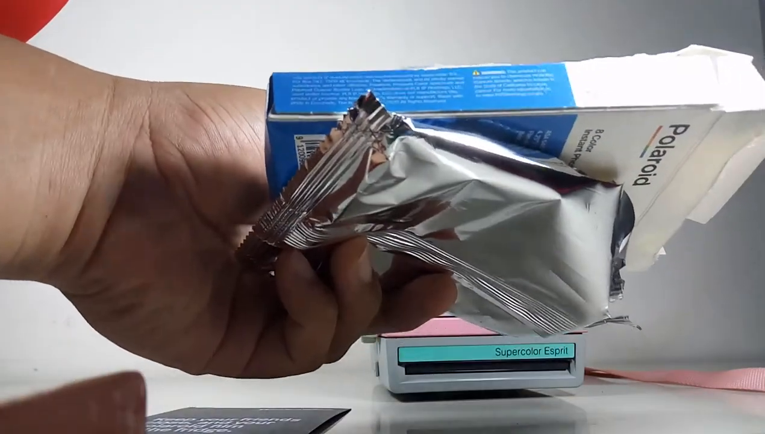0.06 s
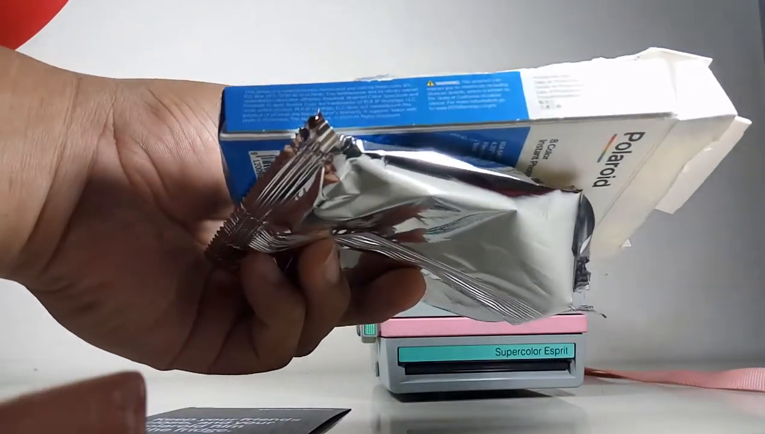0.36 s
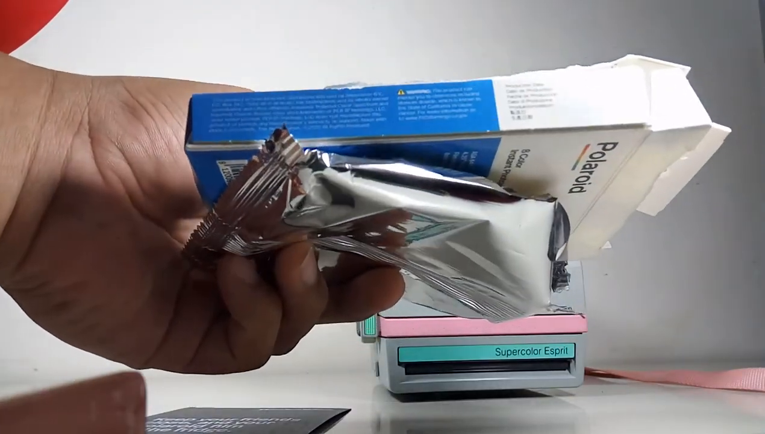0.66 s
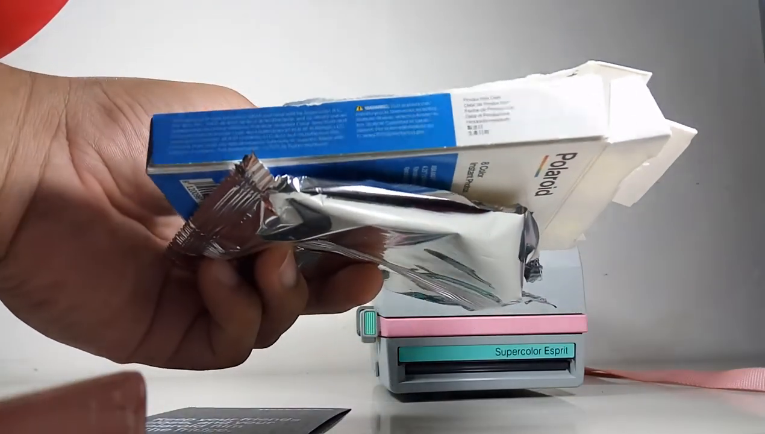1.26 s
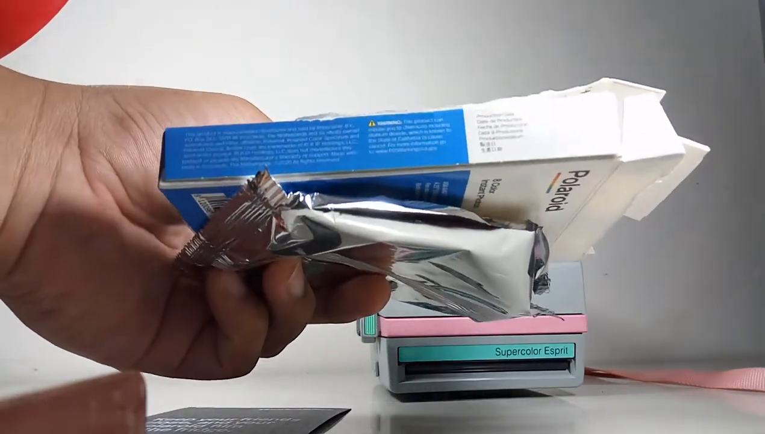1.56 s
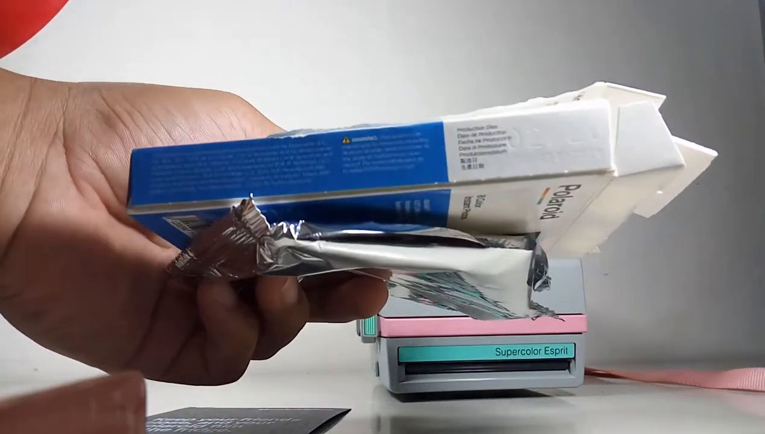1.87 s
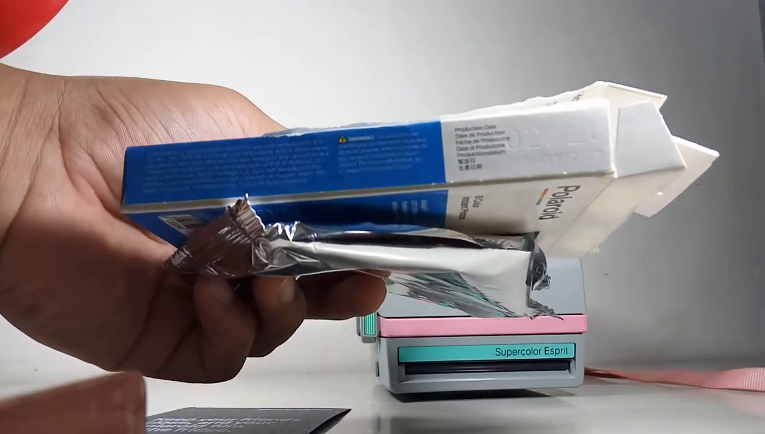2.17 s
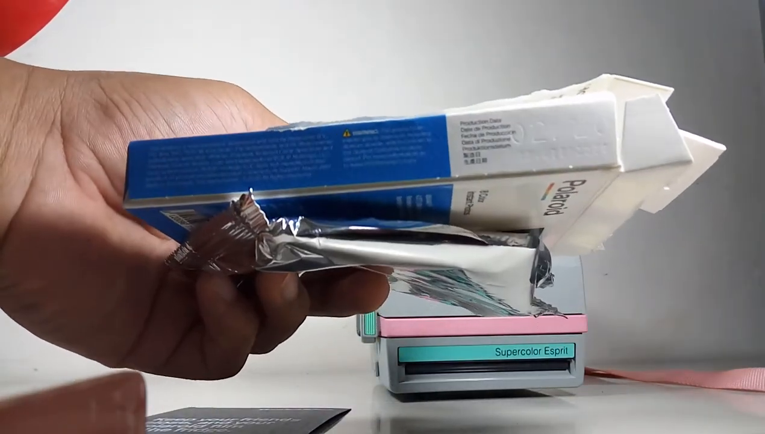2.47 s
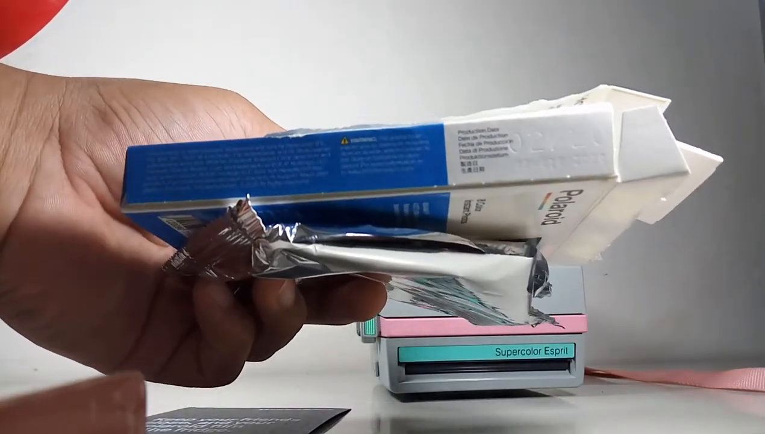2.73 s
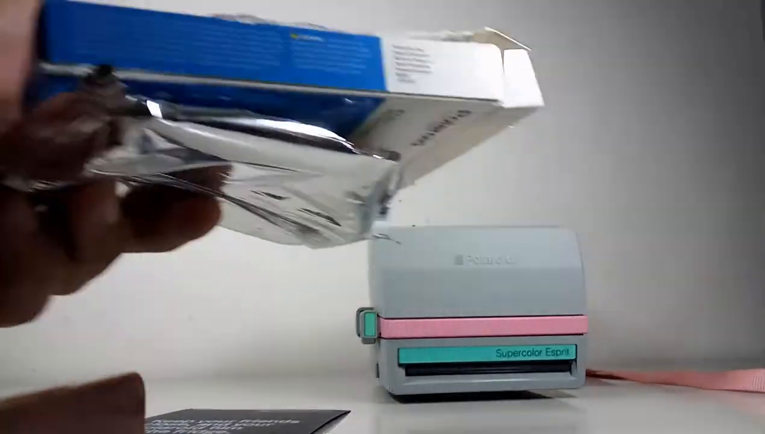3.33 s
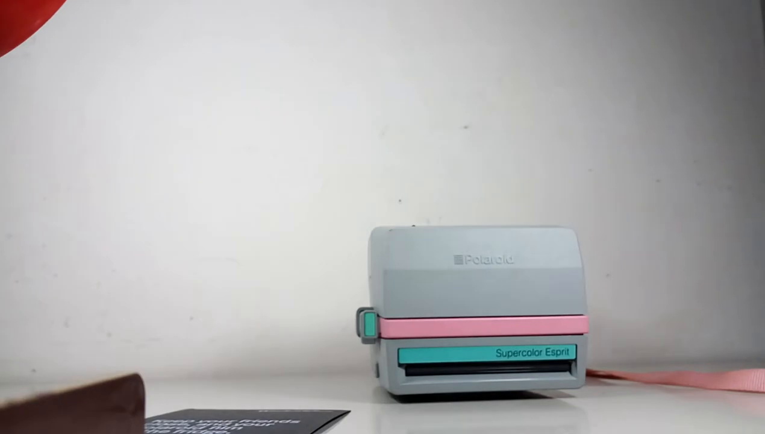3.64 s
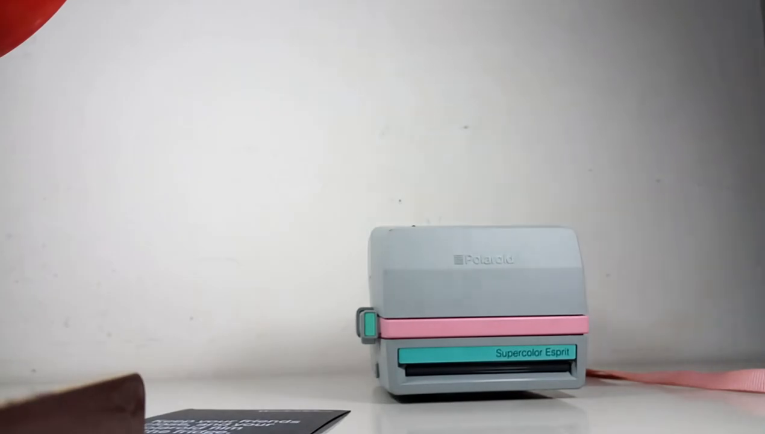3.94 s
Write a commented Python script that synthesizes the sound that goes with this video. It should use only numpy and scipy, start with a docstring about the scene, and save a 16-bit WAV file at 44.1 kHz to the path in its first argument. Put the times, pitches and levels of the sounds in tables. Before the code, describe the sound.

A foil pack crinkles now and then, held with a cardboard box close to the microphone in a small room. A low draught flutters on the right throughout. Near the end the foil slides and crackles more, and the box scuffs.

```python
"""A hand holds a cardboard box and a foil film pack close to the microphones, in a small room.
It opens on a soft scuff of the box and a crease brushing the card; from there to the end, low buffeting
like a draught flutters on the right microphone port, over faint hiss. From 0.75 s creases in the foil pop
now and then, each ringing and cracking through the pack. From 3 s the hand draws away: the foil slides,
swishes and crackles, and from 3.6 s the box scuffs again."""
import sys
import numpy as np
from scipy import signal
from scipy.fft import rfft, irfft
from scipy.io import wavfile

SR = 44100
rng = np.random.default_rng(int(sys.argv[2]) if len(sys.argv) > 2 else 0)


def persist_wave(psi):
    """Save psi, clipped to +-1, as 16-bit WAV."""
    counts = np.round(np.clip(psi, -1, 1) * 32767).astype(np.int16)
    wavfile.write(sys.argv[1], SR, np.atleast_2d(counts).T)


N = 176400
TIME = np.arange(N) / SR

# Levels set each sound's loudness before its trim, the room and the microphones;
# the eddies then also pass the port's tone.

# the cardboard is knocked or scuffed: start_s, level_db, t60_s
BOX_SCUFFS = [(.001, -54, 0.1), (0.021, -55, 0.08), (3.61, -44.5, 0.099), (3.827, -43.5, 0.051),
              (3.8395, -38.5, 0.024), (3.858, -54, 0.13), (3.931, -50.5, 0.091)]
# resonances of the box: pitch_hz, width_hz, gain_db
BOX_MODES = [(595, 67, 5.5), (1030, 750, 3), (1300, 420, 8), (2410, 590, 7.5), (2920, 230, 9.5),
             (3500, 1200, -4)]
# a crease brushes along the card: time_s, level_db
BRUSH_LEVEL = [(0, -54.5), (.03, -75), (.06, -90), (1.74, -94.5), (1.75, -57), (1.785, -67), (1.8, -61),
               (1.85, -71), (1.885, -89), (1.95, -95)]
# thin resonances of that crease: pitch_hz, width_hz, gain_db
CREASE_MODES = [(5600, 210, 7), (6600, 1300, 3)]
# strength of the draught on the port: time_s, level_db
DRAUGHT_LEVEL = [(0.0, -50), (0.02, -33.5), (0.1, -48), (0.13, -55.5), (0.2, -64.5), (0.27, -35),
                 (0.3, -44.5), (0.33, -35.5), (0.4, -44), (0.48, -44), (0.51, -46.5), (0.56, -47.5),
                 (0.59, -69), (0.62, -36.5), (0.76, -46), (0.79, -37), (0.85, -65), (0.88, -41.5),
                 (0.93, -65), (0.96, -44.5), (0.98, -31.5), (1.02, -44), (1.2, -41), (1.34, -44.5),
                 (1.36, -37), (1.4, -44), (1.45, -42), (1.49, -70), (1.54, -64), (1.57, -41), (1.73, -43),
                 (1.77, -44.5), (1.85, -36), (1.88, -41.5), (2.03, -38.5), (2.07, -47.5), (2.14, -40.5),
                 (2.25, -38.5), (2.29, -62), (2.36, -29.5), (2.38, -49), (2.45, -35), (2.48, -47.5),
                 (2.6, -52.5), (2.63, -46), (2.67, -46.5), (2.7, -52), (2.78, -40), (2.82, -33.5),
                 (2.9, -59), (3.0, -41.5), (3.14, -58), (3.24, -46.5), (3.27, -35), (3.36, -40),
                 (3.43, -51), (3.5, -37.5), (3.65, -64.5), (3.68, -37), (4.0, -42)]
# large single eddies hit the port: centre_s, level_db, nominal_pitch_hz
LARGE_EDDIES = [(0.0259, -19, 214), (0.0575, -25, 145), (0.0962, -28, 135), (0.2669, -19.5, 199),
                (0.3185, -28, 252), (0.3378, -24.5, 206), (0.4358, -30, 190), (0.4769, -27, 235),
                (0.5359, -30.5, 190), (0.553, -24, 220), (0.6343, -25.5, 187), (0.6523, -26.5, 242),
                (0.7154, -28, 106), (0.7748, -24, 222), (0.793, -29.5, 161), (0.8824, -19.5, 159),
                (0.9695, -16.5, 279), (0.9943, -19, 324), (1.0515, -33, 150), (1.079, -31.5, 130),
                (1.1151, -24, 240), (1.1597, -20, 203), (1.2015, -21, 204), (1.2489, -22.5, 240),
                (1.36, -19.5, 192), (1.4366, -28, 197), (1.5722, -22.5, 270), (1.5894, -21, 280),
                (1.628, -25.5, 258), (1.663, -21, 196), (1.7165, -20.5, 253), (1.7395, -29, 180),
                (1.817, -20, 264), (1.8343, -20, 298), (1.8505, -17.5, 272), (1.8932, -26.5, 222),
                (1.9149, -27, 273), (1.9345, -31, 284), (1.9628, -30, 160), (1.9785, -21.5, 242),
                (2.0193, -21.5, 264), (2.1388, -23.5, 256), (2.1732, -23, 220), (2.2394, -24.5, 173),
                (2.2563, -36, 180), (2.3186, -32, 198), (2.3405, -27.5, 305), (2.3556, -19.5, 300),
                (2.4149, -22.5, 257), (2.4439, -12, 380), (2.5094, -31.5, 335), (2.5253, -31.5, 305),
                (2.6331, -33, 140), (2.7068, -23.5, 190), (2.7502, -27.5, 200), (2.7958, -31, 138),
                (2.8109, -27, 200), (2.8286, -22.5, 324), (2.9509, -30.5, 229), (2.9819, -29.5, 232),
                (2.9978, -22.5, 265), (3.0272, -29.5, 201), (3.0749, -34.5, 158), (3.2593, -27, 197),
                (3.2863, -23, 146), (3.3226, -24.5, 270), (3.3474, -20, 342), (3.3663, -27, 181),
                (3.4032, -33.5, 188), (3.4801, -30, 315), (3.5057, -28.5, 267), (3.5272, -34, 310),
                (3.6863, -17.5, 294), (3.7597, -27.5, 128), (3.7903, -22, 220), (3.8091, -32, 160),
                (3.8345, -22, 297), (3.8676, -27.5, 185), (3.8929, -27, 166), (3.9539, -31, 168)]
# tone the port gives the eddies: frequency_hz, gain_db
PORT_EQ = [(20, -6), (50, -10), (85, 4), (150, 4.5), (260, 0.5), (380, 1), (600, 0.5), (900, 5.5),
           (1500, -19)]
# tone of the rumble under the eddies: frequency_hz, gain_db
RUMBLE_EQ = [(20, -17), (50, -19), (90, -6.5), (160, -5), (280, -10), (500, -19.5), (1500, -76)]
# tone of the room and microphone hiss: frequency_hz, gain_db
HISS_EQ = [(20, 8), (100, 9), (200, 3), (400, 8), (900, 5.5), (1500, 5), (2200, 0.5), (3000, 1),
           (4500, -4.5), (6600, -5.5), (8300, -19.5), (13000, -24), (15000, -4), (16000, -10.5)]
# a crease pops: start_s, ring_pitch_hz, ring_db, crack_db, sizzle_db, crack_low_cut_hz
CREASE_POPS = [(.749, 2970, -36, -32.5, -47.5, 4230), (0.7956, 6700, -61, -49, -51, 2600),
               (0.8056, 3010, -42.5, -42.5, -62, 2980), (1.0497, 2910, -41.5, -38, -56, 4100),
               (1.7484, 6160, -60, -60, -71.5, 5030), (1.8005, 6400, -62, -60, -90, 5000),
               (1.813, 5070, -51.5, -38, -46, 2700), (1.841, 5600, -58, -52.5, -86, 4970),
               (3.049, 6560, -51, -52.5, -58.5, 2400), (3.1644, 6680, -45.5, -41, -52, 2600),
               (3.3034, 3870, -56.5, -46, -52.5, 3320), (3.348, 5300, -58, -53, -58.5, 3000),
               (3.367, 4860, -71, -48, -69, 2260), (3.429, 3820, -45, -38.5, -59.5, 1800),
               (3.5478, 5090, -56, -48.5, -73, 3600), (3.607, 5040, -25.5, -25, -39.5, 2450),
               (3.624, 7000, -40.5, -51, -59, 1900), (3.6553, 5240, -46, -35.5, -46, 1690),
               (3.716, 3980, -56, -58, -55, 2300), (3.781, 5150, -55.5, -41, -56.5, 2250),
               (3.9199, 6300, -40, -32.5, -53, 1380), (3.9295, 3840, -40.5, -48, -47.5, 1970),
               (3.992, 6630, -43, -36.5, -50, 2200)]
# resonances of the foil pack: pitch_hz, width_hz, gain_db
FOIL_MODES = [(1390, 360, -9), (2213, 306, -3), (2910, 480, -2), (3910, 610, -2.5), (4370, 440, -6),
              (5025, 360, 1), (6027, 460, 1.5), (6300, 410, 2), (7080, 930, -6)]
# tone of the sizzle above those resonances: frequency_hz, gain_db
SIZZLE_EQ = [(5000, -21), (7500, -4.5), (9000, 2.5), (11200, 5.5), (13500, 0.5), (15000, 3.5), (16000, 2)]
# foil slides against the box: time_s, level_db
SLIDE_LEVEL = [(3.04, -73), (3.055, -63), (3.09, -54), (3.13, -51), (3.18, -50.5), (3.23, -55),
               (3.3, -51.5), (3.37, -52.5), (3.41, -59), (3.465, -51), (3.51, -50), (3.56, -61),
               (3.595, -67.5), (3.62, -42), (3.68, -53.5), (3.73, -43.5), (3.765, -50.5), (3.79, -45),
               (3.82, -45.5), (3.845, -36), (3.87, -43.5), (3.91, -43), (3.935, -40), (3.96, -39),
               (3.98, -44), (4.0, -36)]
# sizzle of the sliding foil relative to its body: time_s, level_db
SLIDE_SIZZLE = [(3.05, -1), (3.2, -11.5), (3.35, -10), (3.45, -10), (3.7, -16), (3.8, -6), (3.84, -15.5),
                (3.88, -4), (3.95, -16), (4.0, -5)]
# gliding swish of the sliding foil: time_s, pitch_hz, level_db
SWISH_PATH = [(3.039, 6400, -95), (3.06, 6300, -58), (3.11, 5500, -61), (3.15, 4600, -57),
              (3.21, 4400, -59.5), (3.27, 5400, -58), (3.33, 4800, -63), (3.402, 5300, -66),
              (3.47, 5000, -53.5), (3.53, 5000, -64), (3.59, 5000, -90), (3.75, 6600, -72),
              (3.89, 6800, -67), (4.0, 6600, -68)]
# bass response of the microphones: frequency_hz, gain_db
MICROPHONE_EQ = [(20, -2), (30, 0), (45, -5), (62, -8.5), (85, 2.5), (200, 2)]

FOIL_SIDE, SIZZLE_SIDE = 0.3, 0.73  # stereo width, side over mid
SIZZLE_PAN_DB = [[-2], [2]]  # left, right


def from_db(db):
    """Decibels to gain."""
    return 10 ** (np.asarray(db) / 20)


def unit_rms(x):
    """Scale to unit rms."""
    return x / np.sqrt(np.mean(x ** 2) + 1e-20)


def automation(rows):
    """Join (time_s, value) points into a curve at every sample."""
    return np.interp(TIME, *np.transpose(rows))


def equalise(x, points):
    """Minimum-phase EQ through (frequency_hz, gain_db) points."""
    size = 8192
    hz, db = np.transpose(points)
    grid_hz = np.maximum(np.fft.rfftfreq(size, 1 / SR), 1)
    gain = from_db(np.interp(np.log(grid_hz), np.log(hz), db))
    cepstrum = irfft(np.log(gain))
    cepstrum[1:size // 2] *= 2
    cepstrum[size // 2 + 1:] = 0
    impulse = irfft(np.exp(rfft(cepstrum)))
    return signal.fftconvolve(x, impulse[None], axes=-1)[:, :x.shape[-1]]


def resonate(x, modes):
    """Parallel resonances with alternating polarity."""
    out = 0
    for k, (hz, width_hz, db) in enumerate(modes):
        r = np.exp(-np.pi * width_hz / SR)
        poles = [1, -2 * r * np.cos(2 * np.pi * hz / SR), r * r]
        ringing = signal.lfilter([1, 0, -1], poles, x + 1e-18)
        out = out + (-1) ** k * from_db(db) * (1 - r * r) / 2 * ringing
    return out


def drift(rate_hz):
    """Smooth random wander of unit rms."""
    r = np.exp(-2 * np.pi * rate_hz / SR)
    return unit_rms(signal.lfilter([1], [1, -2 * r, r * r], rng.standard_normal(N + SR))[SR:])


def stereo_noise(side, size):
    """White noise, mostly shared by both channels."""
    mid, spread = rng.standard_normal((2, size))
    return np.array([mid + side * spread, mid - side * spread]) / np.sqrt(1 + side * side)


def burst(t, attack_s, t60_s):
    """Quick rise, exponential fall."""
    return (1 - np.exp(-t / attack_s)) * from_db(-60 * t / t60_s)


def place(out, start_s, sound, db):
    """Mix in a short sound whose energy equals 10 ms at the given level."""
    i = int(start_s * SR)
    rms_in_10_ms = np.sqrt(np.mean(sound ** 2) * sound.shape[-1] / (.01 * SR))
    out[:, i:i + sound.shape[-1]] += sound[..., :N - i] * from_db(db) / rms_in_10_ms


def box_scuffs():
    """Short scuffs sound the dull resonances of the cardboard."""
    out, t = np.zeros((2, N)), TIME[:SR // 8]
    for start_s, db, t60_s in BOX_SCUFFS:
        scrape = stereo_noise(FOIL_SIDE, len(t)) * burst(t, attack_s=0.003, t60_s=t60_s)
        place(out, start_s, resonate(scrape, BOX_MODES), db)
    return out


def friction_slips(slips_per_s=5000, spread_db=2.5):
    """Rubbing foil moves in tiny slips, random in time and strength."""
    hits = rng.random(N) < slips_per_s / SR
    return hits * from_db(spread_db * np.minimum(rng.exponential(1, N), 4))


def crease_brush(slips):
    """A crease brushes lightly along the card, and the slips sound its thin resonances."""
    grains = slips * stereo_noise(FOIL_SIDE, N)
    thin_tone = resonate(resonate(grains, CREASE_MODES), CREASE_MODES)
    return unit_rms(thin_tone) * from_db(automation(BRUSH_LEVEL))


def eddies(rows, stretch=0.97, sharpness=1.94):
    """Each eddy is one smooth pressure swing of a cycle or two, at a random phase."""
    out = np.zeros(N)
    for (centre_s, db, hz), angle in zip(rows, rng.uniform(0, 2 * np.pi, len(rows))):
        centre = int(centre_s * SR)
        near = slice(max(centre - SR // 40, 0), centre + SR // 40)
        phase = 2 * np.pi * hz * (TIME[near] - centre_s) / stretch
        out[near] += from_db(db) * np.cos(phase + angle) / np.cosh(phase * sharpness / np.pi)
    return out


def draught(eddies_per_s=130, lift_db=1.5, spread_db=3, octaves_per_db=0.25, spread_octaves=0.46):
    """Small eddies, higher as they grow stronger, buffet the right port among large ones and a rumble."""
    level_db = automation(DRAUGHT_LEVEL)
    jitter, strength, detune = rng.standard_normal((2000, 3)).T
    centre_s = (np.arange(len(jitter)) + jitter / 4) / eddies_per_s
    db = np.interp(centre_s, TIME, level_db) + lift_db + spread_db * strength
    octaves = octaves_per_db * (np.maximum(db, -45) + 36.5) + spread_octaves * np.clip(detune, -2, 2)
    nominal_hz = np.minimum(191 * 2 ** octaves, 340)
    small_eddies = np.transpose([centre_s, db, nominal_hz])[(centre_s > 0) & (centre_s < TIME[-1])]
    buffeting = equalise((eddies(small_eddies) + eddies(LARGE_EDDIES))[None], PORT_EQ)
    rumble = unit_rms(equalise(rng.standard_normal((2, N)), RUMBLE_EQ)) * from_db(level_db)
    return buffeting * [[0], [1]] + rumble * from_db([[-41], [-3.5]])  # left, right


def hiss(level_db=-67):
    """A steady bed of room and microphone noise."""
    return from_db(level_db) * unit_rms(equalise(stereo_noise(side=0.68, size=N), HISS_EQ))


def crease_pops(wobble_depth=0.027, ragged_db=4):
    """Each pop rings its own crease, unsteady in pitch, and sends a ragged crack through the pack."""
    out, t = np.zeros((2, N)), TIME[:SR // 20]
    ring_trim_db, crack_trim_db, sizzle_trim_db = -.5, -4, 3
    ring_envelope = burst(t, attack_s=.0011, t60_s=.013)
    crack_envelope = burst(t, attack_s=.00033, t60_s=.027)
    sizzle_envelope = burst(t, attack_s=.00033, t60_s=.021)
    wobbles = drift(rate_hz=167).reshape(-1, len(t))
    for (start_s, hz, ring_db, crack_db, sizzle_db, low_cut_hz), wobble in zip(CREASE_POPS, wobbles):
        ring = np.sin(2 * np.pi * np.cumsum(hz * (1 + wobble_depth * wobble)) / SR)
        # the level of the noise jumps every 20 samples
        ragged = from_db(-ragged_db * np.repeat(rng.standard_normal(len(t)), 20)[:len(t)])
        crack = stereo_noise(FOIL_SIDE, len(t)) * ragged * crack_envelope
        crack = signal.sosfilt(signal.butter(4, low_cut_hz, "high", fs=SR, output="sos"), crack)
        sizzle = stereo_noise(SIZZLE_SIDE, len(t)) * ragged * sizzle_envelope
        sizzle = equalise(sizzle, SIZZLE_EQ) * from_db(SIZZLE_PAN_DB)
        place(out, start_s, ring * ring_envelope, ring_db + ring_trim_db)
        place(out, start_s, resonate(crack, FOIL_MODES), crack_db + crack_trim_db)
        place(out, start_s, sizzle, sizzle_db + sizzle_trim_db)
    return out


def foil_slide(slips, trim_db=-6.5, patchy_db=3, flicker_db=1):
    """Slips against the box excite the foil resonances, now one more, now another, with sizzle on top."""
    grains = slips * stereo_noise(FOIL_SIDE, N)
    body = 0
    for k, mode in enumerate(FOIL_MODES):
        body = body + (-1) ** k * resonate(grains, [mode]) * from_db(patchy_db * drift(rate_hz=28))
    sizzle = unit_rms(equalise(slips * stereo_noise(SIZZLE_SIDE, N), SIZZLE_EQ))
    sizzle *= from_db(SIZZLE_PAN_DB) * from_db(automation(SLIDE_SIZZLE))
    level_db = automation(SLIDE_LEVEL) + trim_db - flicker_db * drift(rate_hz=57)
    return (unit_rms(body) + sizzle) * from_db(level_db)


def foil_swish(width_hz=1380):
    """Friction noise in one narrow resonance whose centre glides as the foil slides."""
    time_s, pitch_hz, level_db = np.transpose(SWISH_PATH)
    phase = 2 * np.pi * np.cumsum(np.interp(TIME, time_s, pitch_hz)) / SR
    low_pass = signal.butter(2, width_hz / 2, fs=SR, output="sos")
    slow_noise = unit_rms(signal.sosfilt(low_pass, rng.standard_normal((2, N))))
    band = slow_noise[0] * np.cos(phase) + slow_noise[1] * np.sin(phase)
    return band * from_db(np.interp(TIME, time_s, level_db))


def room(x, predelay_s=0.002):
    """Quick reflections from desk and wall, then a faint tail."""
    t = TIME[:SR // 2]
    echoes = 0
    for db, t60_s in ((-14, 0.072), (-13, 0.19)):  # reflections, tail
        decay = stereo_noise(side=0.37, size=len(t)) * from_db(-60 * t / t60_s) * (t > predelay_s)
        echoes = echoes + from_db(db) * unit_rms(decay) / np.sqrt(len(t))
    return x + signal.fftconvolve(x, echoes, axes=-1)[:, :N]


def scene():
    """Box and foil play in the room; the draught and the hiss stay dry."""
    slips = friction_slips()
    handling = box_scuffs() + crease_brush(slips) + crease_pops() + foil_slide(slips) + foil_swish()
    return room(handling) + draught() + hiss()


def record(dry, high_cut_hz=16100):
    """The microphones thin the deep bass; the top is cut steeply."""
    high_cut = signal.ellip(10, .2, 70, high_cut_hz, fs=SR, output="sos")
    return signal.sosfilt(high_cut, equalise(dry, MICROPHONE_EQ))


dry = scene()
out = record(dry)
persist_wave(out)
```